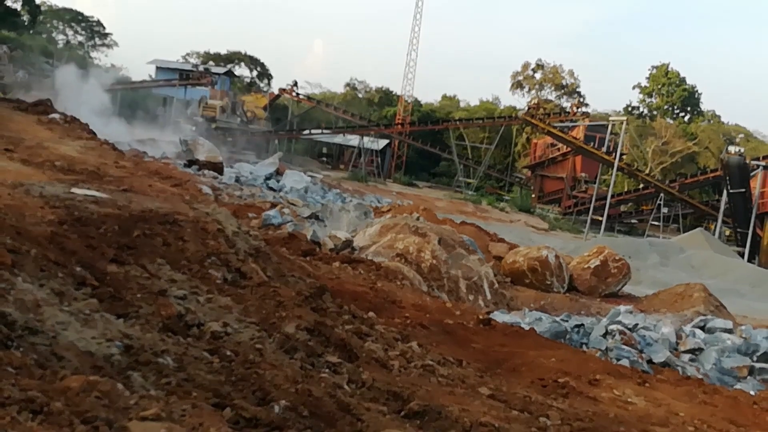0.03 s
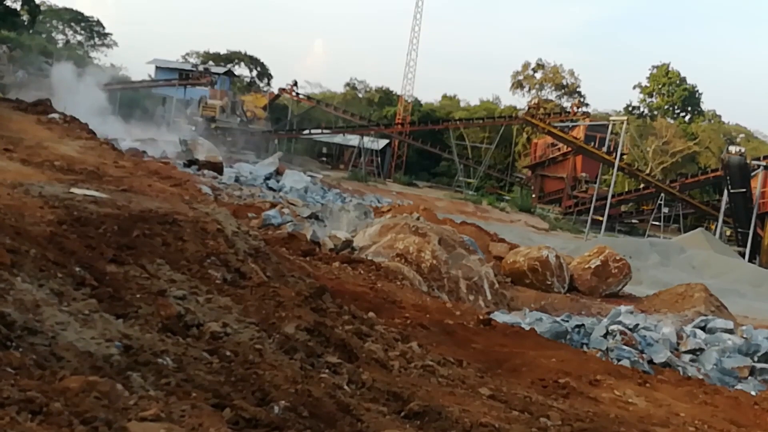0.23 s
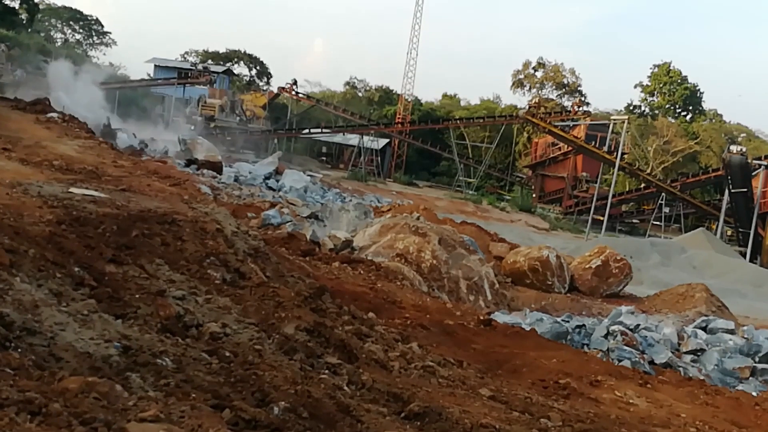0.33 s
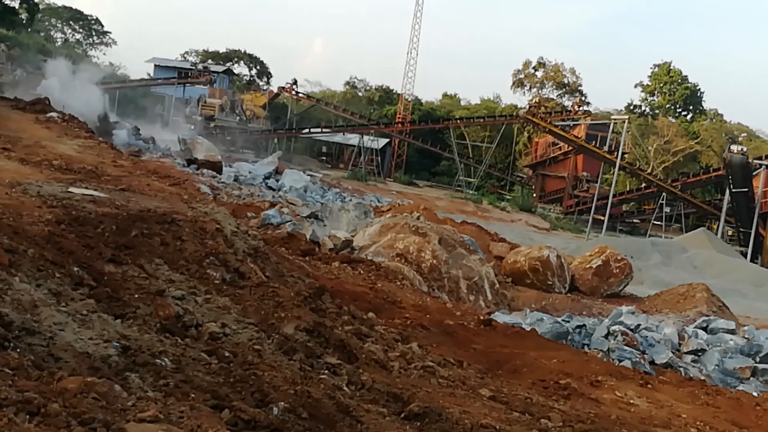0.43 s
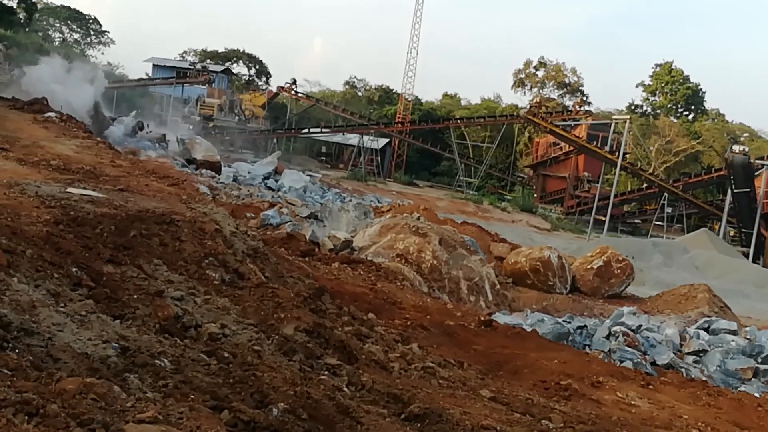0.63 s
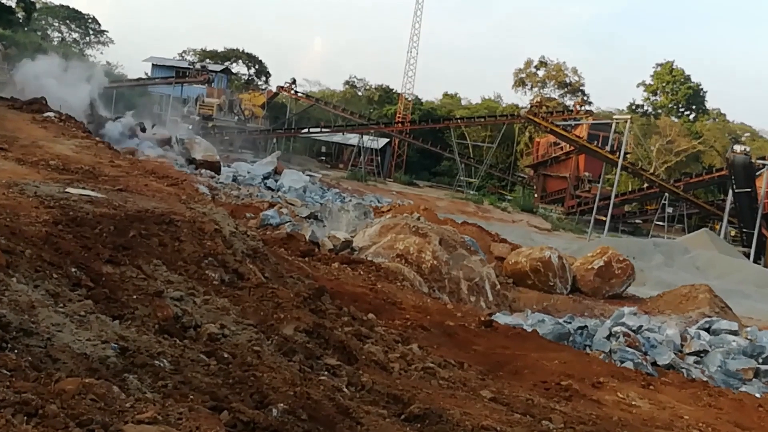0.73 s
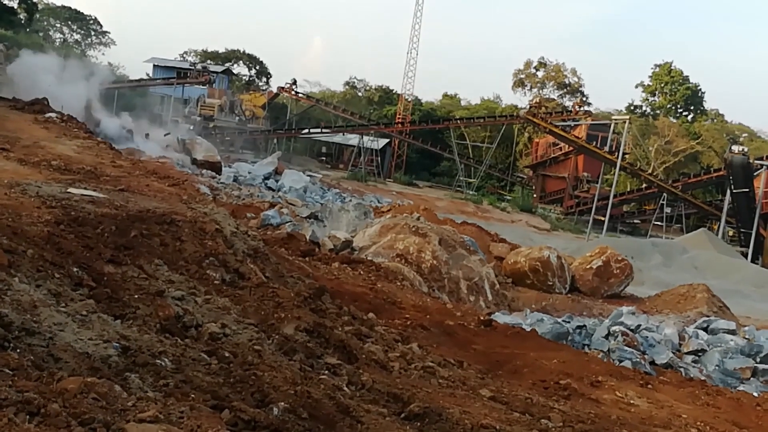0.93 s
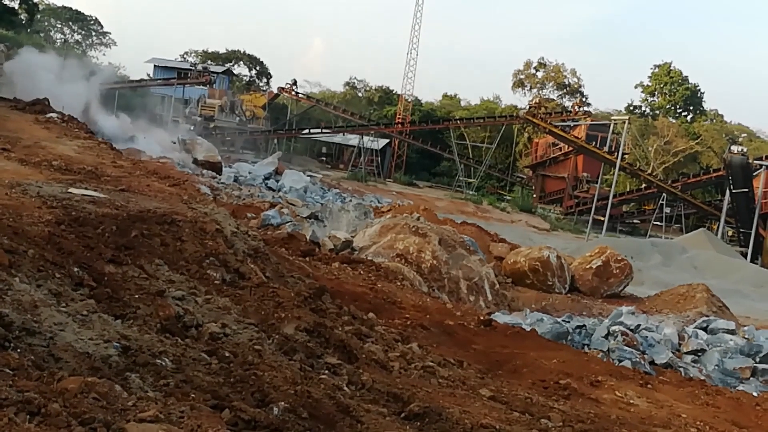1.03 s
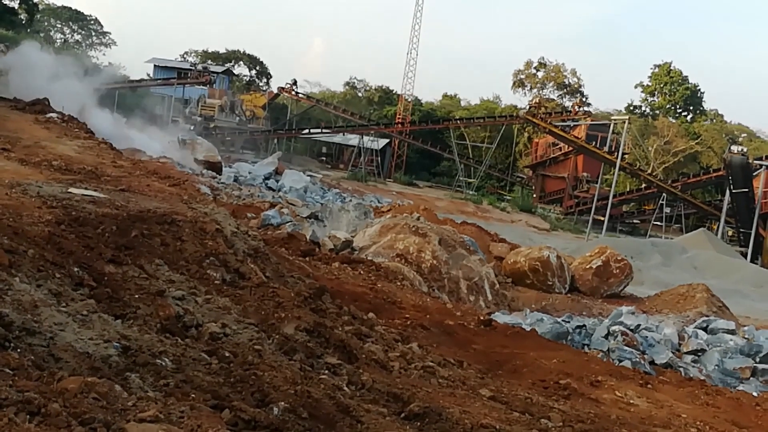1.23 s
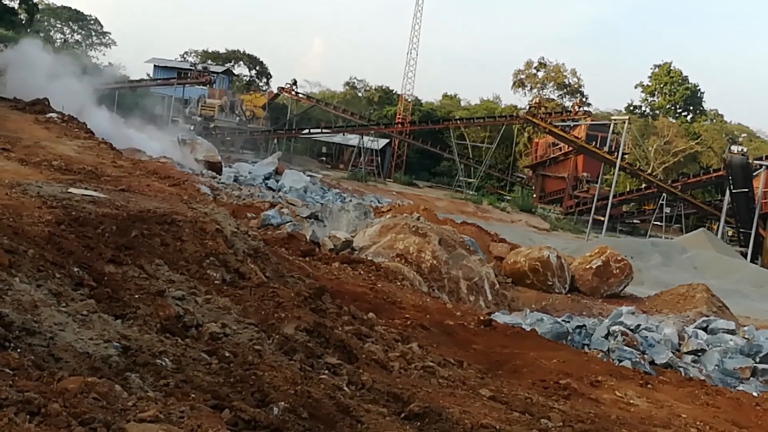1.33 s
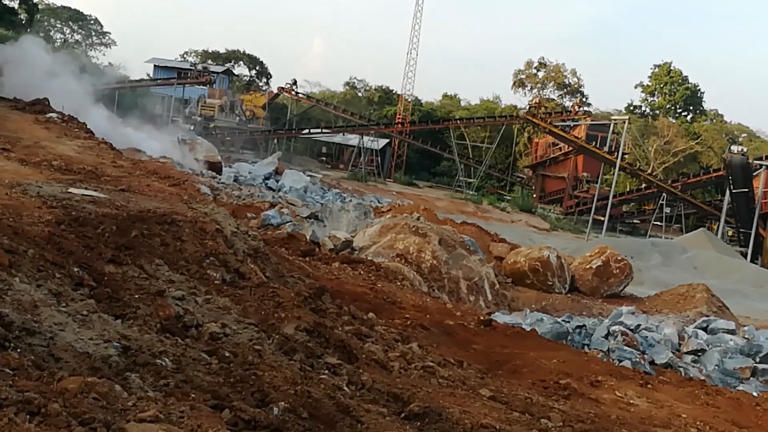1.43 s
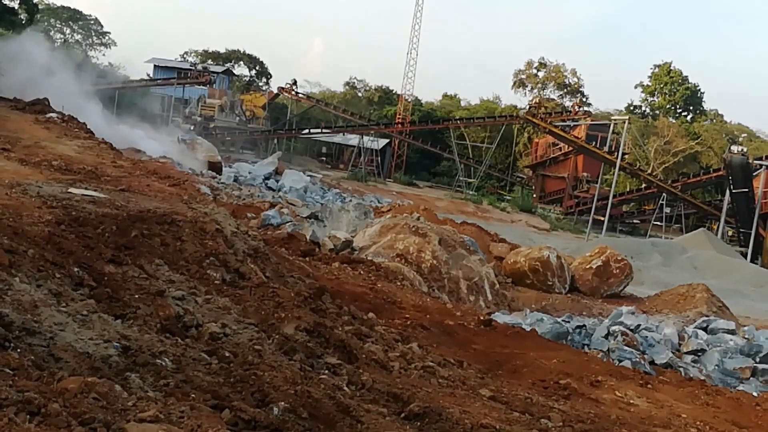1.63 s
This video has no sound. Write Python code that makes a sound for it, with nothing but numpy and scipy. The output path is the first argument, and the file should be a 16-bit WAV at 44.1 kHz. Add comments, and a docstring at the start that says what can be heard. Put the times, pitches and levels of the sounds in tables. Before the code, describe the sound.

A boulder thuds onto earth, then stones tumble and settle over a faint machinery hiss.

```python
"""Blasted rock tumbles in a quarry, over a distant plant's steady hiss, whine and drone.
From 0.2 s blocks thud on earth, the ground rumbles and stones knock; at 0.26 s the heaviest
boulder lands and overloads the recorder. From 0.5 s rock clanks in the plant's steel chute.
Near 1 s a little gravel slides down the heap, while the thuds and the rumble die away."""
import sys
import numpy as np
from scipy.fft import rfft, irfft, next_fast_len
from scipy.io import wavfile
from scipy.ndimage import map_coordinates

SR = 44100
rng = np.random.default_rng(int(sys.argv[2]) if len(sys.argv) > 2 else 0)


def wav_out(sig):
    """Save sig, one row per channel (or a flat mono array), as 16-bit PCM at SR to the path in sys.argv[1]."""
    wavfile.write(sys.argv[1], SR, np.round(np.clip(np.atleast_2d(sig).T, -1, 1) * 32767).astype(np.int16))


N = 74970

# strength of the gravel slide: t/s, level/dB
SLIDE_LEVEL = [(0, -59.5), (.24, -52.5), (.285, -44.5), (.34, -51.5), (.45, -51.5), (.6, -57), (.74, -54.5),
               (.85, -50.5), (.95, -48), (1.1, -49), (1.25, -55), (1.45, -59.5), (1.7, -59.5)]
# left-right correlation of ground sounds and of far sounds: f/Hz, correlation
GROUND_COHERENCE = [(100, 1), (300, 0.92), (600, .2)]
FAR_COHERENCE = [(200, 0.66), (900, 0.2), (2000, 0.69), (5700, 0.47), (7000, 0.13)]


def boulder():
    """The edge bites and booms briefly, the full weight follows, and rock crunches under it."""
    # crunch spectrum: f/Hz, relative density/dB
    crunch_spectrum = [(150, -6.5), (250, -16), (480, -9), (800, 2), (1200, 0.5), (1700, -7), (2500, -12.5),
                       (14000, -44.5)]
    landing_s, crunch_rise_s, crunch_fall_s = 0.2603, 0.004, 0.0086
    t = since(landing_s)
    envelope = np.exp(-np.abs(t) / np.where(t < 0, crunch_rise_s, crunch_fall_s))
    crunch = amp(-28) * envelope * spread(rng.standard_normal((2, N)), crunch_spectrum, GROUND_COHERENCE)
    edge = thud(peak_s=0.2566, db=-6.5, hz=309.7, rise_cycles=1, fall_cycles=2.21)
    return edge + push(landing_s, db=4.6, hz=64.3) + crunch


def push(peak_s, db, hz):
    """One smooth push on the ground: a pressure crest between two troughs."""
    u = (np.pi * hz * since(peak_s)) ** 2
    return amp(db) * (1 - 2 * u) * np.exp(-u)


def thud(peak_s, db, hz, rise_cycles, fall_cycles):
    """A soft blow that swells and dies within a few cycles."""
    cycles = since(peak_s) * hz
    envelope = np.exp(-(cycles / np.where(cycles < 0, rise_cycles, fall_cycles)) ** 2)
    return amp(db) * envelope * np.cos(2 * np.pi * cycles)


def blocks():
    """Lesser blocks land; the earth damps each blow in a cycle or two."""
    # landings: t/s, level/dB, f/Hz
    landings = [(.201, -13.5, 75), (0.224, -12, 136.6), (.277, -5.5, 141), (0.309, -11, 100.5),
                (0.3661, -27, 330), (0.37, -15.5, 91.5), (0.392, -18.5, 95.5), (0.423, -19, 59),
                (0.458, -24, 65), (.477, -27, 197), (.533, -29.5, 100), (0.61, -28, 88), (.618, -36.5, 149),
                (0.764, -27, 90), (0.832, -30, 84), (.862, -33, 202), (.997, -37.5, 310), (0.999, -33, 160),
                (1.004, -32.5, 57.7), (1.175, -35.5, 59.5), (1.225, -36.5, 154), (1.295, -33, 98),
                (1.441, -38.5, 147)]
    return sum(thud(*row, rise_cycles=0.38, fall_cycles=1.36) for row in landings)


def rumble():
    """Countless smaller lumps roll and settle."""
    # envelope: t/s, level/dB
    envelope = [(0, -53), (.16, -50.5), (.21, -27.5), (.29, -23), (.35, -29.5), (.46, -30), (.56, -39.5),
                (.68, -44.5), (.85, -42.5), (1.1, -46), (1.28, -41.5), (1.42, -49.5), (1.7, -51)]
    # ground spectrum: f/Hz, relative density/dB
    spectrum = [(20, -33.5), (40, 3), (70, 1.5), (110, 3.5), (155, -2), (205, -5), (265, -15), (330, -13.5),
                (430, -26.5), (900, -43), (3000, -93)]
    return level(envelope) * spread(rng.standard_normal((2, N)), spectrum, GROUND_COHERENCE)


def knocks():
    """Stones strike each other and ring briefly in rough modes."""
    # strikes: t/s, level/dB, f/Hz, t60/s, left-right/dB
    strikes = [(.249, -23.5, 1048, 0.024, -5), (.2633, -18.5, 1400, .016, 1), (.361, -28, 715, 0.086, -8.5),
               (.362, -29, 514, 0.046, -4), (.823, -32, 931, 0.027, 15), (.827, -30.5, 1234, 0.04, -1),
               (0.827, -37, 2143, .03, 10), (.878, -37.5, 1103, 0.037, 2), (0.916, -31.5, 2800, .018, 13),
               (.9163, -36, 6186, 0.01, 12), (.936, -34.5, 950, 0.036, 1), (.986, -36.5, 1150, 0.04, 2),
               (1.097, -36.5, 719, 0.047, -7), (1.352, -38, 2214, 0.051, 10.5)]
    # stone modes: frequency ratio, level/dB
    stone_modes = [(.66, -17.5), (1.002, -1), (1.251, -14), (2.1, -22.5)]
    out = np.zeros((2, N))
    for start_s, db, hz, t60_s, pan_db in strikes:
        t = np.maximum(since(start_s), 0)
        ring = np.zeros((2, N))
        for ratio, mode_db in stone_modes:
            rough_rad = 1.05 * wobble(0.16 * hz)
            stereo_rad = rng.normal(0, 0.57, (2, 1))
            ring += amp(mode_db) * np.sin(2 * np.pi * hz * ratio * t + rough_rad + stereo_rad)
        out += ring_envelope(start_s, db, t60_s, attack_s=0.00088) * pan(pan_db) * ring
    return out


def gravel():
    """Dense grains of uneven size trickle down in small surges."""
    # grain spectrum: f/Hz, relative density/dB
    spectrum = [(150, -27), (350, -1), (600, -2), (950, 0.5), (1600, -3), (2500, -4), (4000, -10.5),
                (7000, -20.5), (10000, -19.5), (11000, -34.5), (15500, -30)]
    grains_per_s, size_spread_db = 8300, 0.5
    hits = rng.random((2, N)) < grains_per_s / SR
    grains = hits * rng.standard_normal((2, N)) * amp(size_spread_db * rng.standard_normal(N))
    surges = amp(0.91 * wobble(45.75))
    return level(SLIDE_LEVEL) * surges * pan(db=3.5) * spread(grains, spectrum, FAR_COHERENCE)


def pebbles(count):
    """Small stones click at random, as loud as the slide is strong."""
    centre_hz, spread_octaves, decay_cycles = 1403, 1.19, 4.5
    t = np.arange(1024) / SR
    out = np.zeros((2, N + len(t)))
    for start, (pitch, size, side) in zip(rng.integers(0, N, count), rng.uniform(-1, 1, (count, 3))):
        cycles = t * centre_hz * 2 ** (spread_octaves * pitch)
        click = np.sin(2 * np.pi * cycles) * np.exp(-cycles / decay_cycles)
        out[:, start:start + len(t)] += amp(4 + 3.5 * size) * pan(2.1 + 4 * side) * click
    return level(SLIDE_LEVEL) * out[:, :N]


def chute():
    """Rocks tumble through a steel chute; each blow sets the same rough modes ringing."""
    # blows: t/s, level/dB
    clanks = [(0.524, -45), (.612, -45), (.784, -44), (.829, -45.5), (1.026, -42), (1.111, -44),
              (1.531, -44), (1.615, -44)]
    # steel modes: f/Hz, width/Hz, relative level/dB
    steel_modes = [(2583, 160, 1), (2864, 190, -5), (3276, 200, -3.5)]
    blows = sum(ring_envelope(start_s, db, t60_s=0.1, attack_s=0.0027) for start_s, db in clanks)
    ring = unit(sum(amp(db) * band(hz, width_hz) for hz, width_hz, db in steel_modes))
    return blows * pan(db=8.5) * ring


def plant():
    """Far machinery: a hiss, rattling whines and a low engine drone."""
    # hiss spectrum: f/Hz, relative density/dB
    hiss_spectrum = [(150, -15), (320, 3), (450, -3), (800, -5.5), (1350, 1.5), (1550, -6), (2650, -5),
                     (3350, -4.5), (3750, -7.5), (4500, -9.5), (5500, -10), (6400, -12.5), (7000, -18.5),
                     (10000, -21), (15500, -26.5)]
    # hiss envelope: t/s, level/dB
    hiss_level = [(0, -48), (.6, -51.5), (1.2, -49), (1.7, -55)]
    # hiss balance: f/Hz, left-right/dB
    hiss_pan = [(300, 0.5), (800, -10), (1200, -3.5), (1700, 9.5), (3400, 10), (4100, -2.5), (4800, 3),
                (6200, 9), (7500, -1)]
    # narrow resonances: f/Hz, width/Hz, level/dB, left-right/dB
    whines = [(1165, 120, -56, 0), (2579, 33, -63.5, 12), (4030, 130, -63, -2.5), (5647, 90, -71.5, 5.5)]
    # engine tones: f/Hz, level/dB
    drone = [(29.5, -49.5), (60, -47)]
    hiss = spread(rng.standard_normal((2, N)), hiss_spectrum, FAR_COHERENCE)
    out = level(hiss_level) * unit(filtered(hiss, lambda hz: pan(along(hiss_pan, hz))))
    for hz, width_hz, db, pan_db in whines:
        out += amp(db + 0.82 * wobble(25.2)) * pan(pan_db) * band(hz, width_hz)
    for hz, db in drone:
        peak = np.sqrt(2) * amp(db + 2.5 * wobble(8.34))
        out += peak * np.sin(2 * np.pi * hz * since(0) + 0.5 * wobble(7.4))
    return out


def amp(db):
    """Decibels to gain."""
    return 10 ** (np.asarray(db) / 20)


def unit(x):
    """Scale to rms 1."""
    return x / np.sqrt(np.mean(x ** 2) + 1e-20)


def along(points, hz):
    """Interpolate (f/Hz, value) points on a log axis."""
    knots_hz, values = np.transpose(points)
    return np.interp(np.log(hz + 1), np.log(knots_hz + 1), values)


def since(start_s):
    """Seconds from start_s, per sample."""
    return np.arange(N) / SR - start_s


def level(points):
    """Gain per sample from (t/s, level/dB) points."""
    return amp(np.interp(since(0), *np.transpose(points)))


def ring_envelope(start_s, db, t60_s, attack_s):
    """Gain of a struck body: fast rise, exponential decay."""
    t = np.maximum(since(start_s), 0)
    return amp(db - 60 * t / t60_s) * (1 - np.exp(-t / attack_s))


def wobble(knots_per_s):
    """Smooth random curve, rms near 1."""
    return map_coordinates(rng.standard_normal(400), [np.arange(N) * knots_per_s / SR], mode="mirror")


def filtered(x, response):
    """Multiply the spectrum of x by response(hz)."""
    size = next_fast_len(N + SR // 4)
    return irfft(rfft(x, size) * response(np.fft.rfftfreq(size, 1 / SR)), size)[..., :N]


def pan(db):
    """Left and right gains for a level difference."""
    return amp(np.array([[0.5], [-0.5]]) * db)


def spread(pair, spectrum, coherence):
    """Two unrelated signals become coloured, partly coherent stereo of rms 1."""
    def mid_side_gains(hz):
        angle = np.arccos(np.clip(along(coherence, hz), -1, 1)) / 2
        return amp(along(spectrum, hz)) * [np.cos(angle), np.sin(angle)]
    mid, side = filtered(pair, mid_side_gains)
    return unit(np.array([mid + side, mid - side]))


def band(centre_hz, width_hz):
    """Stereo noise in one resonance, rms 1."""
    noise = rng.standard_normal(N) + 0.86 * rng.standard_normal((2, N))
    return unit(filtered(noise, lambda hz: 1 / (1 + (2 * (hz - centre_hz) / width_hz) ** 2)))


def arrive(pair, right_late_s):
    """Sound from one side reaches the two microphones at different times."""
    return filtered(pair, lambda hz: np.exp(1j * np.pi * hz * right_late_s * np.array([[1], [-1]])))


def scene():
    """Ground sounds reach the left microphone first, far sounds the right."""
    ground = arrive(boulder() + blocks() + rumble(), right_late_s=0.00034)
    far = arrive(gravel() + plant() + chute(), right_late_s=-0.00028)
    return ground + knocks() + pebbles(count=130) + far


def record(dry):
    """The recorder clips at its ceiling and keeps nothing above its band limit."""
    ceiling, hardness, top_hz = 0.92, 27, 15750
    clipped = dry / (1 + np.abs(dry / ceiling) ** hardness) ** (1 / hardness)
    return filtered(clipped, lambda hz: hz < top_hz)


dry = scene()
out = record(dry)
wav_out(out)
```